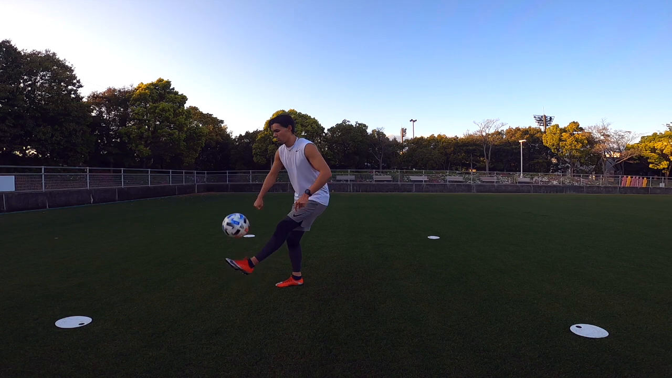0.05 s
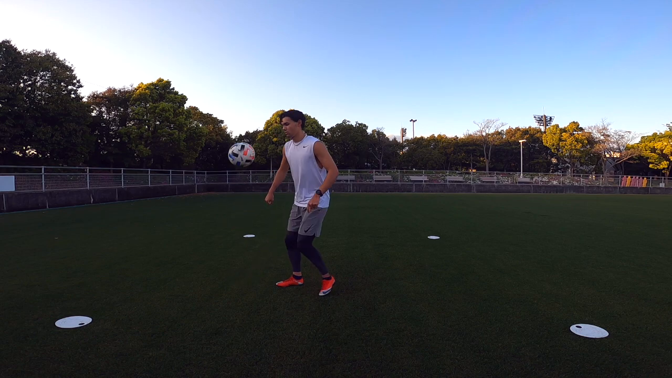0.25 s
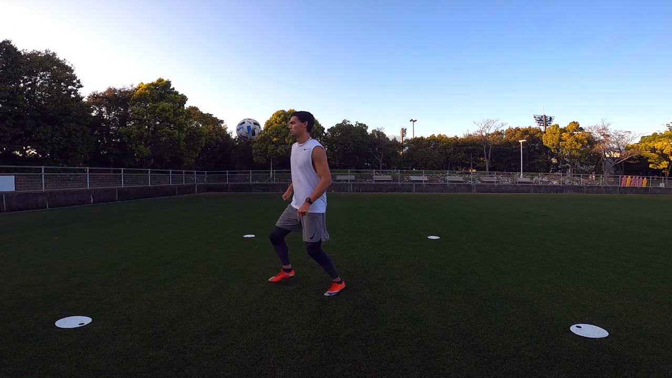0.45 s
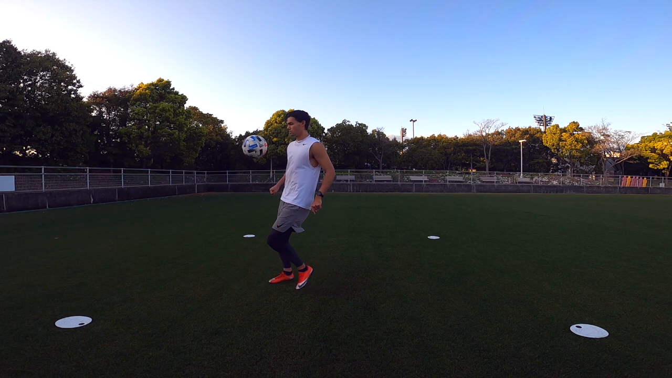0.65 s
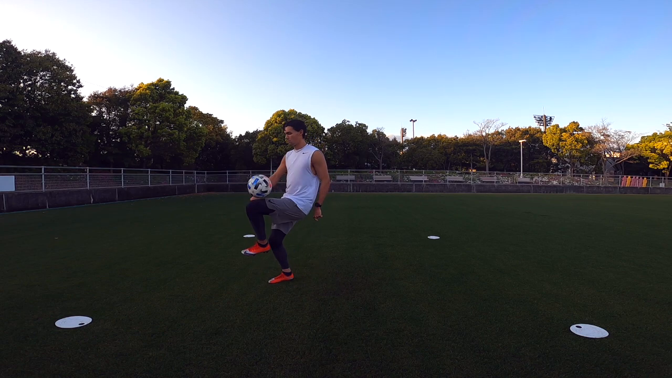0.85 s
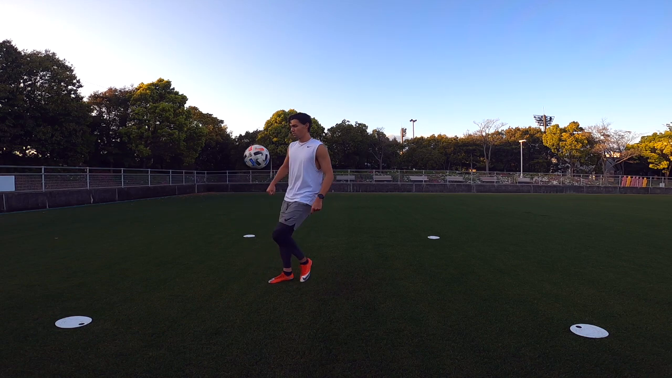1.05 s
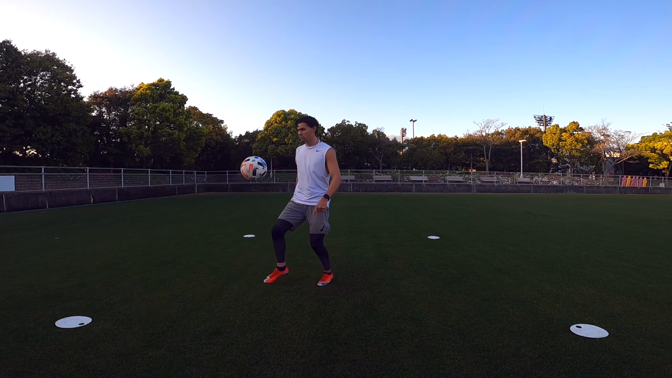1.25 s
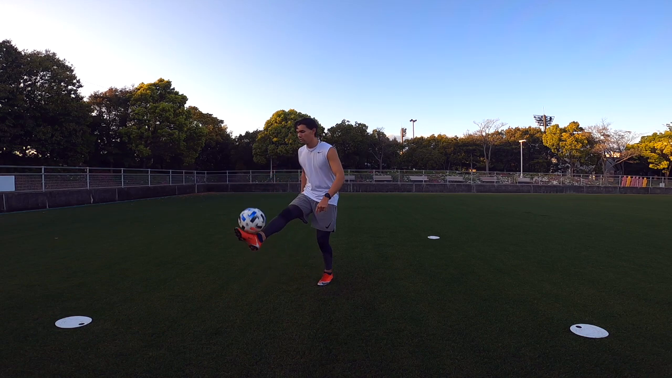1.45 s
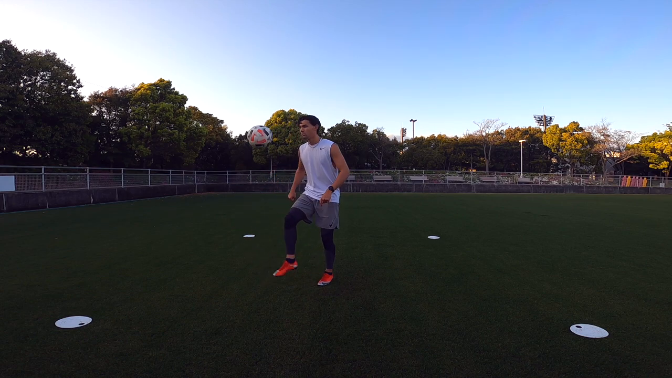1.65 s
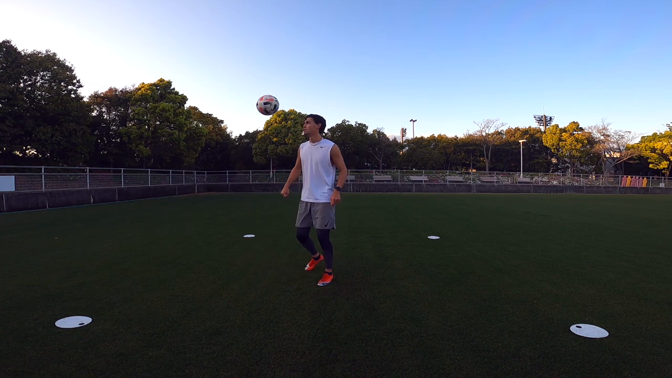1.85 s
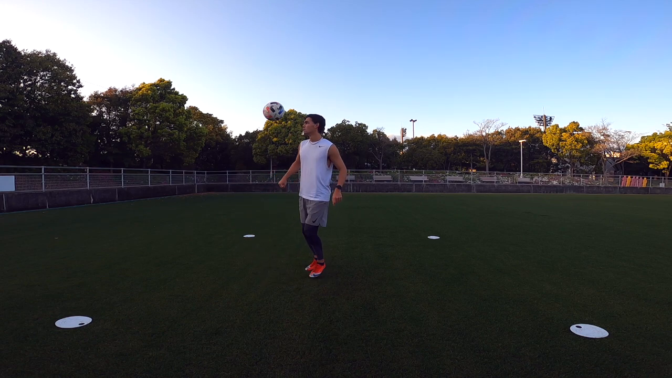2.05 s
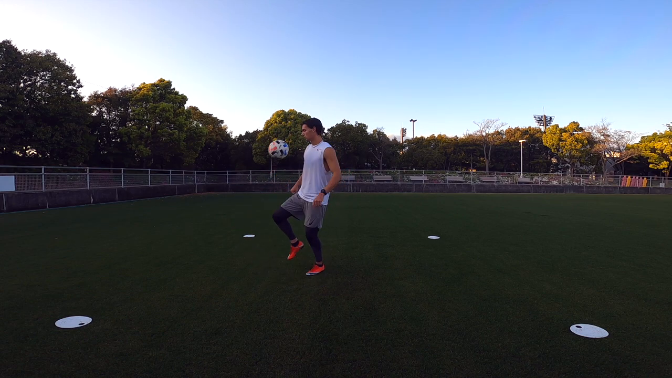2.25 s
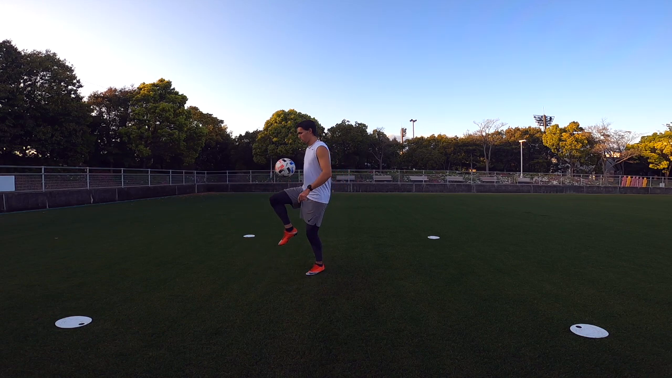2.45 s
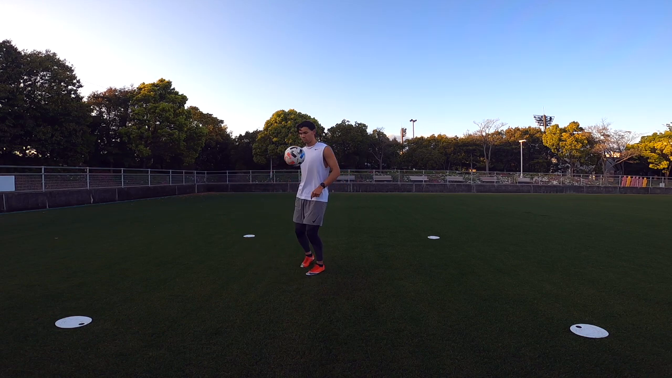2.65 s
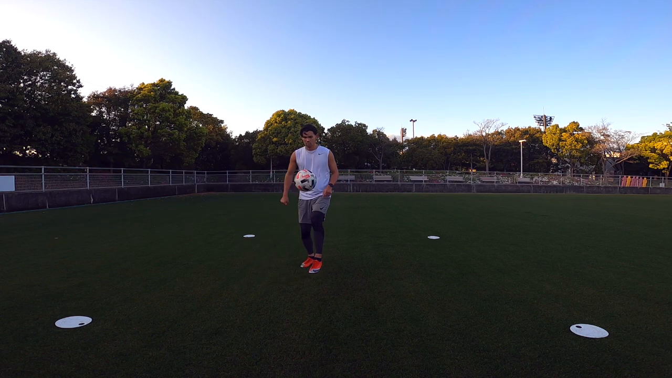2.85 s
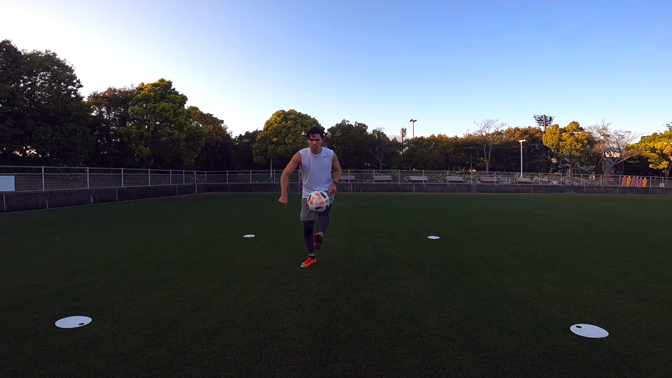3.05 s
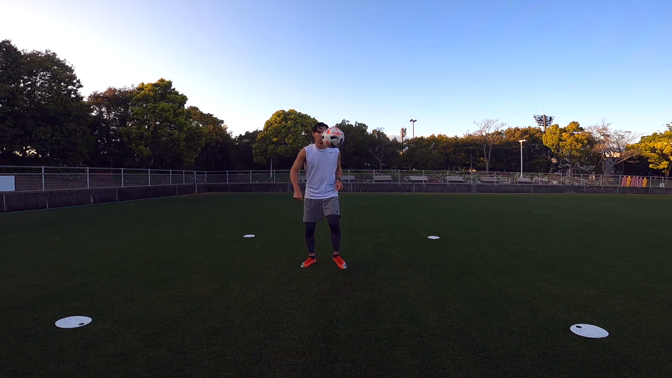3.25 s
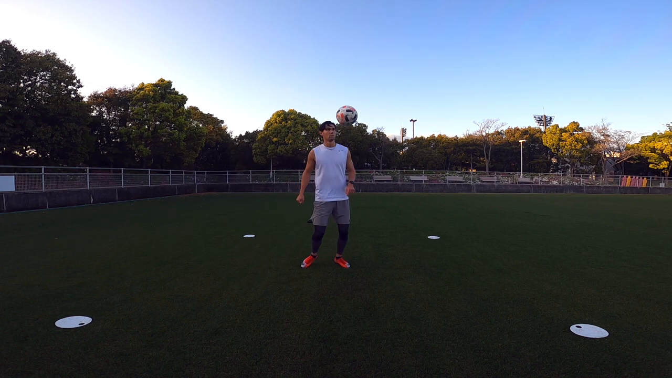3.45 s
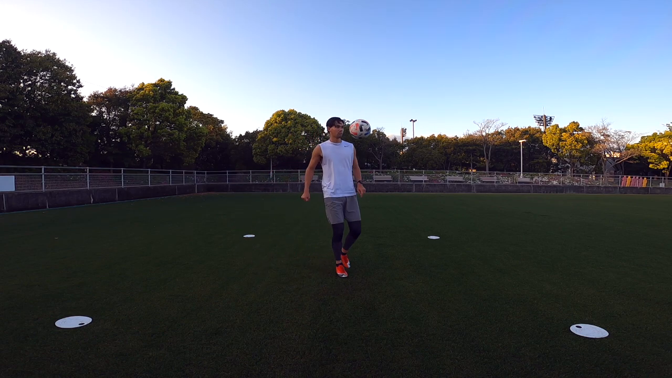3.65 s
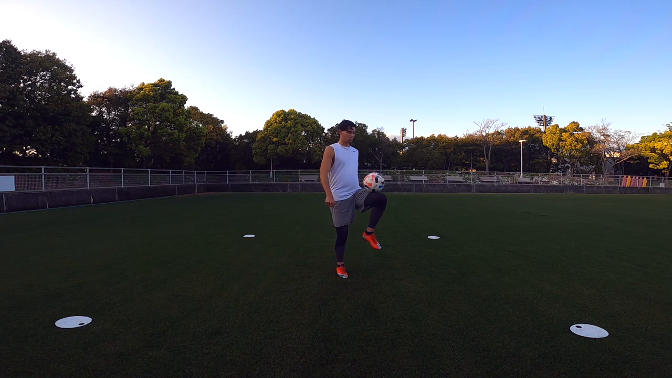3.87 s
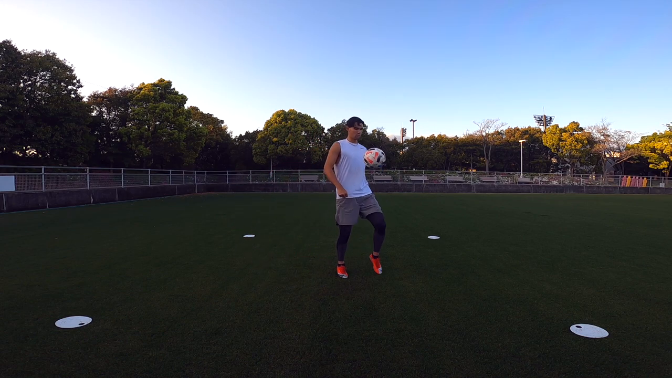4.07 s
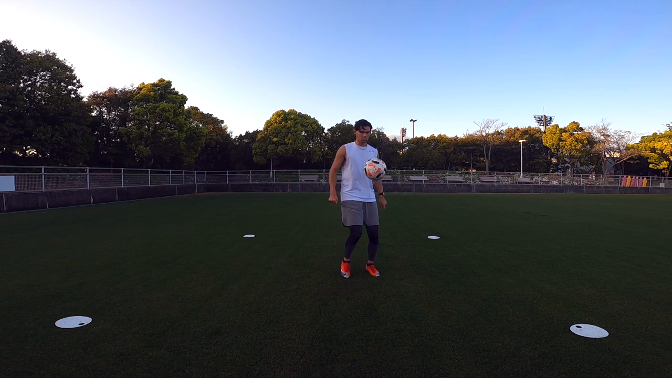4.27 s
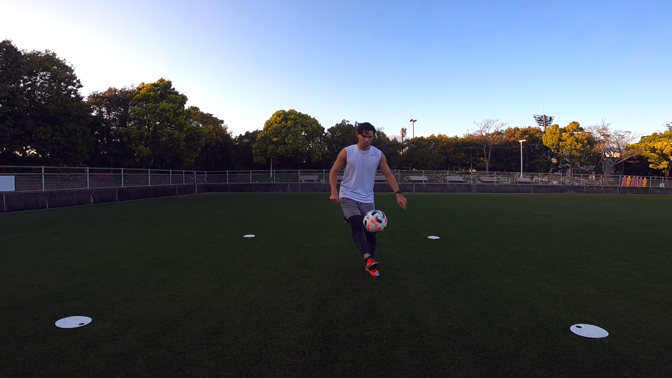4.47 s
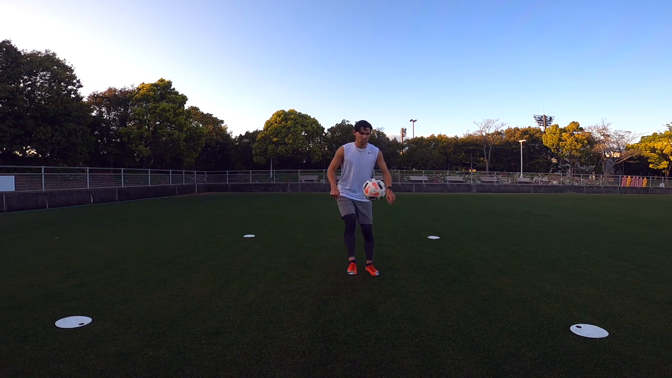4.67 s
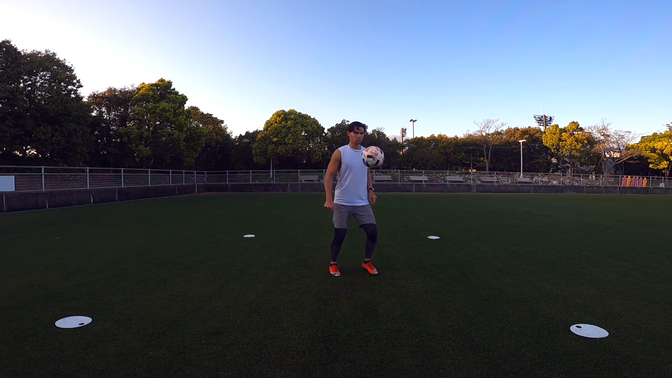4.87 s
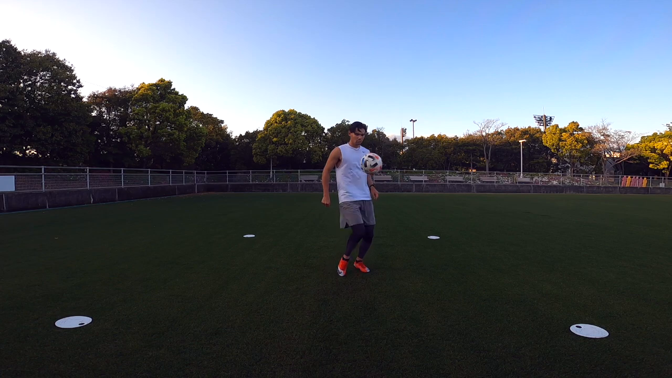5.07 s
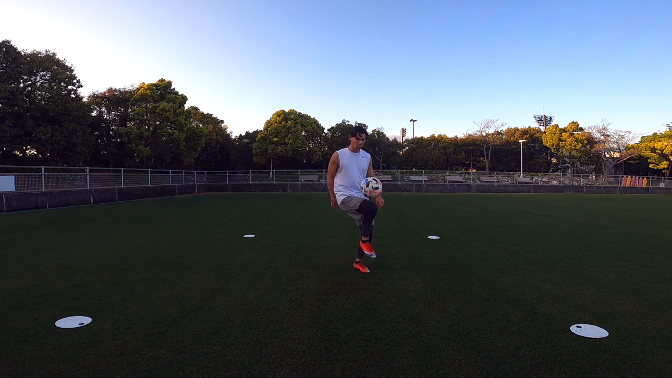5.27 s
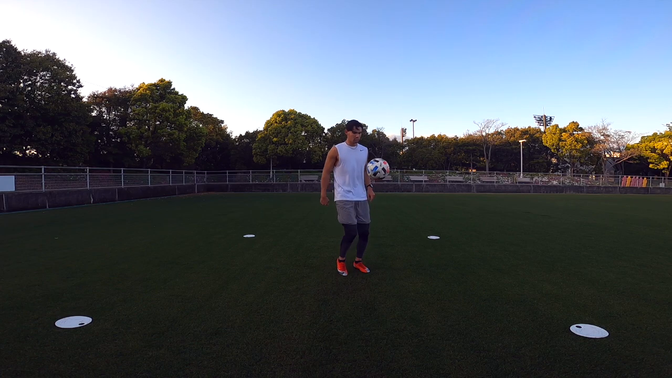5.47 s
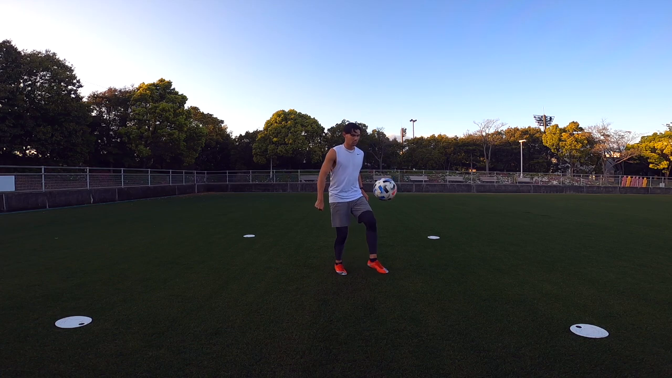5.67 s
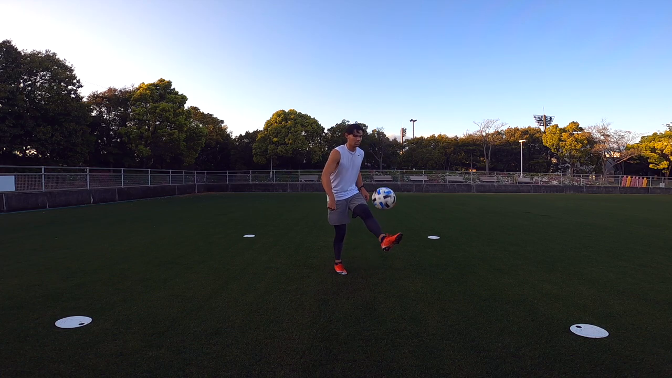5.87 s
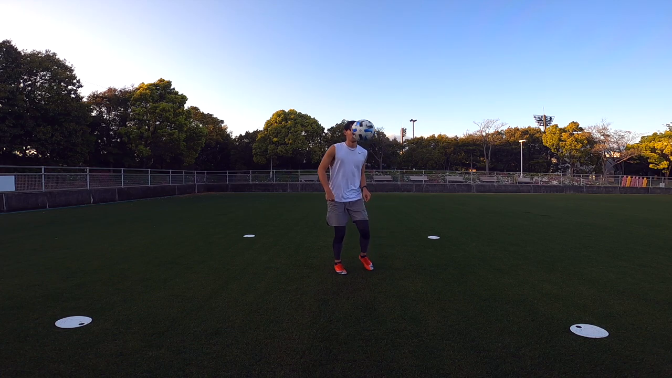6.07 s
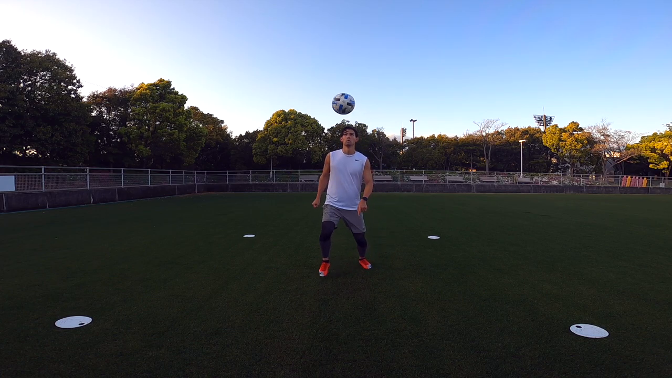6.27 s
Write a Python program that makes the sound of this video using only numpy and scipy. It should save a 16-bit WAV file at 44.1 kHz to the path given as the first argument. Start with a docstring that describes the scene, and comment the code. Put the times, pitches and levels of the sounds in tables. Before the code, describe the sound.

Steady keepy-uppies a few metres away: thumping boot kicks and flatter thigh smacks, light brushing footsteps on turf, low far traffic behind.

```python
"""An outdoor turf pitch: a football is juggled a few metres from the microphone, by turns off boot and thigh.
Each touch is a noisy slap of the casing, a swelling sine thud of the squashed ball and ringing modes.
The ground mirrors the slap; a fence echoes the player and trees and stands scatter a faint tail of noise.
Between touches the boots brush and roll onto the turf, as swells of grainy noise with sharp stud clicks.
Behind lie a far town, as wavering coloured noise, and a far bird, as thin wavering tones."""
import sys
import numpy as np
from scipy import signal
from scipy.fft import rfft, irfft, next_fast_len
from scipy.io import wavfile
from scipy.ndimage import uniform_filter1d

SR = 44100
rng = np.random.default_rng(int(sys.argv[2]) if len(sys.argv) > 2 else 0)


def bounce(signal):
    """Save signal as a 16-bit WAV file at the path given by the first command-line argument."""
    frames = np.transpose(np.atleast_2d(signal))
    limited = np.clip(frames, -1, 1)
    pcm = np.round(limited * 32767).astype(np.int16)
    wavfile.write(sys.argv[1], SR, pcm)


N = 278712  # length of the scene in samples


def from_db(db):
    """Decibels to amplitude gain."""
    return 10 ** (np.asarray(db) / 20)


def rms_one(x):
    """Scale to unit rms."""
    return x / np.sqrt(np.mean(x ** 2) + 1e-20)


def add(track, start_s, sound):
    """Mix a sound into a track from start_s on."""
    start = int(np.clip(round(start_s * SR), 0, N - 1))
    track[start:start + len(sound)] += sound[:N - start]


def delayed(x, delay_s):
    """The same sound delay_s later, cut to the same length."""
    return np.concatenate([np.zeros(int(abs(delay_s) * SR)), x])[:len(x)]


def coloured(x, points, tilt_db=0):
    """Causal minimum-phase filter through (freq_hz, level_db) points, tilted by tilt_db per octave."""
    size = 2 * next_fast_len(len(x))
    octave = np.log2(np.maximum(np.fft.rfftfreq(size, 1 / SR), 1))
    freq_hz, level_db = np.transpose(points)
    curve_db = np.interp(octave, np.log2(freq_hz), level_db)
    # the tilt pivots at 1 kHz and stays level below 500 Hz
    curve_db = curve_db + tilt_db * np.maximum(octave - np.log2(1000), -1)
    # folding the cepstrum onto positive times gives minimum phase
    cepstrum = irfft(np.log(from_db(curve_db)))
    cepstrum[1:size // 2] *= 2
    cepstrum[size // 2 + 1:] = 0
    response = np.exp(rfft(cepstrum))
    return irfft(rfft(x, size) * response)[:len(x)]


def drift(rate_hz):
    """Slow random wandering with spread 1, weakening above rate_hz."""
    spectrum = rfft(rng.standard_normal(N)) / (1 + (np.fft.rfftfreq(N, 1 / SR) / rate_hz) ** 2)
    spectrum[0] = 0
    return rms_one(irfft(spectrum, N))


def burst(t, fade_s):
    """Exponentially dying noise of unit energy."""
    noise = rng.standard_normal(len(t)) * np.exp(-t / fade_s)
    return noise / np.linalg.norm(noise)


# colour of the town's low rumble: (freq_hz, relative level_db)
RUMBLE = [(10, -23), (18, -9), (26, -4.5), (35, 1.5), (48, -1), (61, -4), (80, -9), (102, -11.5),
          (155, -15), (197, -16), (310, -23.5), (360, -30), (450, -39.5), (900, -91)]
# colour of the far traffic's wash: (freq_hz, relative level_db)
TRAFFIC = [(240, -33.5), (400, -7.5), (587, -5.5), (692, -4.5), (827, -5), (974, -4), (1210, -7.5),
           (1340, -9.5), (2650, -28.5), (3340, -32.5), (3990, -33.5), (5780, -39), (7920, -45),
           (9080, -49.5), (10600, -66), (13700, -91), (22000, -120)]
# swell of the traffic, heard as departures from the mean of the points: (time_s, level_db)
TRAFFIC_SWELL = [(0.0, -53), (0.63, -55), (0.93, -52), (2.02, -52), (2.31, -51), (2.82, -52), (3.36, -51),
                 (4.89, -50), (6.04, -53), (6.32, -52)]
RUMBLE_DB, TRAFFIC_DB = -32, -51.7  # rms levels before swell and waver


def town(rumble_waver_db=1.45, traffic_waver_db=0.07):
    """The far town: low rumble and the smooth wash of traffic, two coloured noises that waver slowly."""
    rumble = rms_one(coloured(rng.standard_normal(N), RUMBLE))
    rumble = rumble * from_db(RUMBLE_DB + rumble_waver_db * drift(5.4))
    time_s, level_db = np.transpose(TRAFFIC_SWELL)
    swell_db = np.interp(np.arange(N) / SR, time_s, level_db - np.mean(level_db))
    wash = rms_one(coloured(rng.standard_normal(N), TRAFFIC))
    return rumble + wash * from_db(TRAFFIC_DB + swell_db + traffic_waver_db * drift(4.7))


def slap(t, crackle_db, crackle_s, size=400):
    """The casing lands with a one-sample snap and crackles while its panels flatten; unit energy."""
    spread = np.exp(-np.minimum(t / crackle_s, 4) ** 4)
    spectrum = rfft(rng.standard_normal(len(t)) * spread)
    # dividing by the smoothed spectrum makes the crackle even across frequency
    smooth_power = uniform_filter1d(abs(spectrum) ** 2, size)
    crackle = irfft(spectrum / np.sqrt(smooth_power)) * (t < 2 * crackle_s)
    snap = -1.0 * (t == 0)
    contact = from_db(crackle_db) * crackle / np.linalg.norm(crackle) + snap
    return contact / np.linalg.norm(contact)


def clack(x, freq_hz, boost_db, sharpness=5.2):
    """The spot that is struck stresses one broad resonance."""
    resonance = signal.lfilter(*signal.iirpeak(freq_hz, sharpness, fs=SR), x)
    return x + (from_db(boost_db) - 1) * resonance


def ball_ring(t, modes, rise_s=.0002):
    """Dying sine modes, each excited slightly differently every time; the soft contact rounds the onset."""
    ring = np.zeros(len(t))
    for freq_hz, level_db, t60_s in modes:
        fading_db = level_db + rng.normal(0, 1) - 60 * t / t60_s
        ring += from_db(fading_db) * np.sin(2 * np.pi * freq_hz * t)
    return ring * np.tanh((t / rise_s) ** 2)


def thud(t, freq_hz, squash_s, steepness):
    """The ball squashes and springs back: a brief sine, strongest at full squash."""
    u = t / squash_s
    return -np.sin(2 * np.pi * freq_hz * t) * (u * np.exp(1 - u)) ** steepness


# ball touches: (start_s, limb, force_db, brightness_db_per_octave, crackle_s, ground_lag_s,
#                clack_hz, clack_boost_db, knock_db)
TOUCHES = [ (0.1260, "boot", 2, -0.7, 0.0040, 0.0012, 1800, 2.5, 0.5),
           (0.9422, "thigh", -4.5, -2, 0.0014, 0.0021, 10500, 19.5, 1.5),
           (1.5652, "boot", -3, 0, 0.0046, 0.0019, 1640, 4, 3),
           (2.4820, "thigh", 2.5, 0.1, 0.001, 0.0021, 3300, 6.5, -2),
           (3.1192, "boot", -3, -0.5, 0.0065, 0.0011, 2470, 5, -1.5),
           (3.987, "thigh", -4, -0.1, 0.002, 0.0024, 4540, 3.5, -1.5),
           (4.6415, "boot", 0.5, -1.6, 0.0025, 0.00127, 4100, 3, 0.5),
           (5.3495, "thigh", -8.5, 0.3, 0.0016, 0.0018, 2500, 6, -2.5),
           (5.9287, "boot", -5.5, 2.2, 0.0015, 0.0017, 4150, 6, -6.5)]
# colour of the slap for each limb: (freq_hz, level_db)
SLAP = { "boot": [(100, -11), (400, 7), (800, 3.5), (1100, 2), (1400, 12.5), (1750, 5), (2100, -1.5),
        (2500, 0.5), (3800, -5), (5200, -5), (7200, -17.5), (9000, -19.5), (11500, -39), (16000, -56)],
        "thigh": [(100, 7.5), (300, 10), (520, 9), (720, -0.5), (1100, 4.5), (1400, 9), (1750, 7),
        (2100, 0), (2550, -0.5), (5200, -3.5), (7500, -15), (9200, -18.5), (12000, -34), (16000, -47)]}
# the ball's answer to a touch of 0 dB, for each limb:
# (thud_db, thud_hz, squash_s, landing_knock_db, release_knock_db)
LIMBS = {"boot": (-8.9, 117, .007, -31, -26), "thigh": (-22.5, 232, .0058, -24.5, -37)}
# flexing of the casing: (freq_hz, relative level_db, t60_s)
CASING_MODES = [(369.5, 0, 0.038), (490, -3.5, 0.037)]
# air inside the ball, quick modes and a faint lingering ping: (freq_hz, relative level_db, t60_s)
AIR_MODES = [(1313, 1.5, 0.025), (1270, -27.5, .16), (1660, -15, .02), (3098, -31.5, 0.3),
             (3780, -35, 0.22)]
# a harder touch thuds louder (dB per dB) and higher (octaves per dB)
THUD_FOLLOWS, THUD_RISE_OCT_PER_DB = .3, .016
# level of the air's ring; its tilt is AIR_TILT times the touch's brightness, about the pivot
AIR_DB, AIR_TILT, AIR_PIVOT_HZ = -28.5, 4.5, 2150
EVEN_CRACKLE_S = .002  # a crackle this long is as strong as the first snap; longer is stronger
HIT_SIZE = 16384  # samples per hit


def ball(ground_share=0.66, flutter_db=-10, release_squashes=1.6):
    """All touches: slap of the casing, ringing air inside, knock of the flexing casing and thud."""
    out, t = np.zeros(N), np.arange(HIT_SIZE) / SR
    for start_s, limb, force_db, bright_db, crackle_s, lag_s, clack_hz, clack_db, knock_db in TOUCHES:
        thud_db, thud_hz, squash_s, landing_db, release_db = LIMBS[limb]
        haste = 2 ** (THUD_RISE_OCT_PER_DB * force_db)  # a harder touch runs faster

        contact = slap(t, 20 * np.log10(crackle_s / EVEN_CRACKLE_S), crackle_s, size=160)
        # the turf mirrors the slap, later the higher the ball is met
        mirrored = ground_share * delayed(contact, lag_s)
        # the skin flutters on briefly
        flutter = from_db(flutter_db) * burst(t, fade_s=0.0095)
        crack = coloured(contact + mirrored + flutter, SLAP[limb], bright_db)
        crack = from_db(force_db) * clack(crack, clack_hz, clack_db)

        # a bright touch favours the high modes of the air
        air_modes = [(freq_hz, level_db + AIR_TILT * bright_db * np.log2(freq_hz / AIR_PIVOT_HZ), t60_s)
                     for freq_hz, level_db, t60_s in AIR_MODES]
        air = from_db(AIR_DB + force_db) * delayed(ball_ring(t, air_modes), lag_s / 2)

        # the casing flexes on landing and again when it springs free
        flex = from_db(knock_db) * ball_ring(t, CASING_MODES)
        release = delayed(flex, release_squashes * squash_s / haste)
        knock = from_db(landing_db) * flex + from_db(release_db) * release

        squash = thud(haste * t, thud_hz, squash_s, steepness=4.1)
        squash = from_db(thud_db + THUD_FOLLOWS * force_db) * squash
        add(out, start_s, crack + air + knock + squash)
    return out


FENCE_LAG_S = .0575  # about 20 m of extra path


def surroundings(x, fence_db=-26, scatter_db=-17.5, scatter_s=.05):
    """A fence returns one thin echo; trees and stands scatter the sharp sounds into a faint, diffuse tail."""
    fence = coloured(delayed(x, FENCE_LAG_S), [(200, -22), (1500, -6), (4000, 4.5), (9000, 3)])
    # the tail is noise that follows the smoothed energy of the treble
    treble = signal.sosfilt(signal.butter(2, 2600, "high", fs=SR, output="sos"), x)
    keep = np.exp(-1 / (scatter_s * SR))
    energy = signal.lfilter([1 - keep], [1, -keep], treble ** 2)
    haze_colour = [(200, -2.5), (1400, 2), (2200, -1.5), (3200, 1), (5000, -5.5), (7000, -19),
                   (10000, -29.5), (15000, -56.5)]
    haze = rms_one(coloured(rng.standard_normal(N), haze_colour))
    return from_db(fence_db) * fence + from_db(scatter_db) * np.sqrt(energy) * haze


def swell(t, rise_s, hold_s, fade_s):
    """A smooth rise to 1 at t = 0, a hold, then an exponential fade."""
    rising = (t / rise_s) ** 2
    fading = np.maximum(t - hold_s, 0) / fade_s
    return np.exp(-np.minimum(np.where(t < 0, rising, fading), 20))


# steps on the turf; roll_delay_s is the time until the sole has rolled down:
# (landing_s, brush_db, brush_s, roll_delay_s, roll_db)
STEPS = [ (0.378, -42.3, .024, .061, -49.5), (0.622, -60.5, .012, .044, -58), (0.765, -65, .02, .04, -69),
         (1.233, -58, .005, .065, -60), (1.970, -54, .005, .095, -57.5), (2.222, -53, .002, .06, -64.5),
         (2.578, -60, .016, .04, -68), (2.728, -59.5, .008, .06, -62), (3.478, -58, .014, .115, -60.5),
         (3.743, -52, .012, .05, -66), (4.216, -56, .016, .095, -63), (4.870, -45.7, .019, .062, -55),
         (5.056, -59, .002, .1, -62.5), (5.579, -58.5, .018, .09, -59.5), (6.211, -49.7, .014, .063, -54)]
# the sharpest clicks of studs on turf granules: (start_s, level_db)
STUDS = [(0.403, -8), (1.334, -19), (2.023, -17), (2.604, -22), (2.761, -20.5), (6.275, -18),
         (6.285, -17.5)]
# colour of the turf's crunch: (freq_hz, level_db)
TURF = [(300, -10.5), (900, -3.5), (1300, -2), (1750, 1.5), (2200, -1), (3300, -1), (5800, -10.5),
        (7800, -18.5), (9200, -17.5), (11000, -26), (15000, -41)]
BRUSH_ATTACK_S, BRUSH_FADE_S = .008, .011
ROLL_RISE, ROLL_FADE = .42, .55  # shares of the roll's delay
TICKS_PER_S, TICK_DB, TICK_SPREAD_DB = 2, -33, 2.5  # loose granules, at random


def boots(grains_per_s=1100, grain_db=0, swish_db=-3):
    """Each step brushes the blades, then crunches granules as the sole rolls down; studs and granules click."""
    t, pressure, clicks = np.arange(N) / SR, np.zeros(N), np.zeros(N)
    for landing_s, brush_db, brush_s, roll_delay_s, roll_db in STEPS:
        since_landing = t - landing_s
        pressure += from_db(brush_db) * swell(since_landing, BRUSH_ATTACK_S, brush_s, BRUSH_FADE_S)
        roll = swell(since_landing - roll_delay_s, ROLL_RISE * roll_delay_s, 0, ROLL_FADE * roll_delay_s)
        pressure += from_db(roll_db) * roll
    # sparse random grains over a steady swish
    grains = rms_one(rng.standard_normal(N) * (rng.random(N) < grains_per_s / SR))
    swish = from_db(swish_db) * rng.standard_normal(N)
    crunch = rms_one(coloured(from_db(grain_db) * grains + swish, TURF))
    for start_s, level_db in STUDS:
        add(clicks, start_s, from_db(level_db) * burst(t[:HIT_SIZE], fade_s=0.00046))
    ticks = (rng.random(N) < TICKS_PER_S / SR) * from_db(TICK_DB + TICK_SPREAD_DB * rng.standard_normal(N))
    return pressure * crunch + coloured(clicks + ticks, TURF, tilt_db=-0.5)


# faint notes of a far bird: (start_s, length_s, pitch_hz, level_db)
BIRD = [(1.035, .09, 4990, -78), (1.105, .05, 5280, -82), (1.135, .085, 3500, -78)]


def bird(waver_hz=40):
    """Thin, nearly pure notes: sines of randomly wavering pitch that swell and fade."""
    t, waver, out = np.arange(N) / SR, waver_hz * drift(80), np.zeros(N)
    for start_s, length_s, pitch_hz, level_db in BIRD:
        arch = np.sin(np.pi * np.clip((t - start_s) / length_s, 0, 1))
        tone = np.sin(2 * np.pi * np.cumsum(pitch_hz + waver) / SR)
        out += np.sqrt(2) * from_db(level_db) * arch * tone
    return out


def scene():
    """The player a few metres away, in the open, with the town and the bird far off."""
    player = ball() + boots()
    return (player + surroundings(player) + town() + bird())[None, :]


def record(dry):
    """One microphone channel, its top cut steeply above 15 kHz by an elliptic low-pass."""
    lowpass = signal.ellip(10, .1, 80, 15000, fs=SR, output="sos")
    return signal.sosfilt(lowpass, dry)


dry = scene()
out = record(dry)
bounce(out)
```